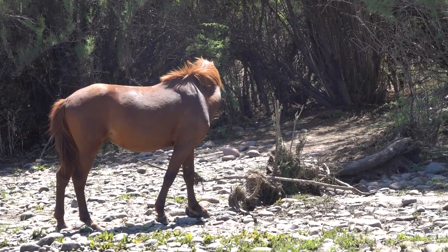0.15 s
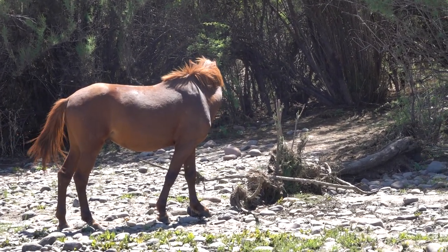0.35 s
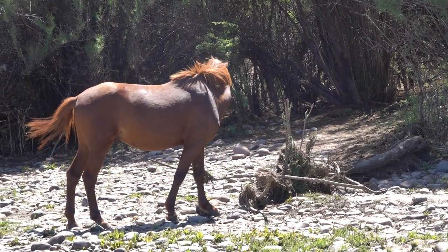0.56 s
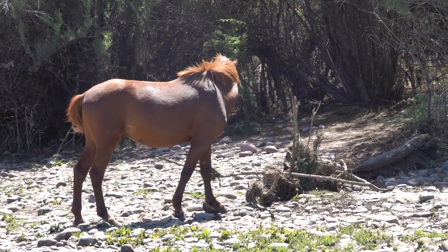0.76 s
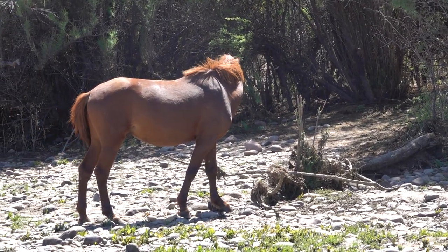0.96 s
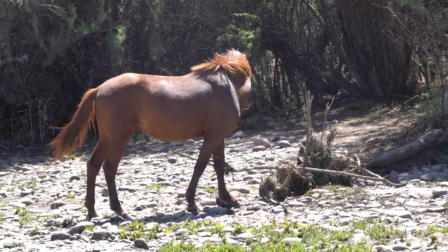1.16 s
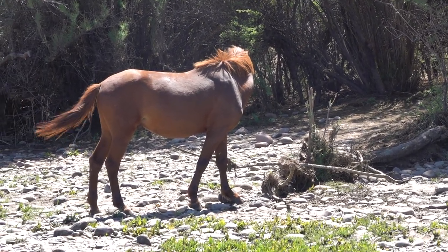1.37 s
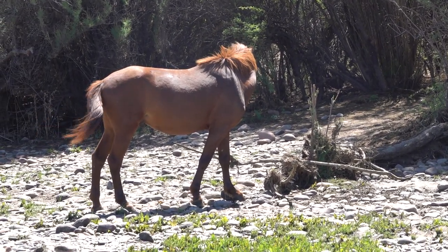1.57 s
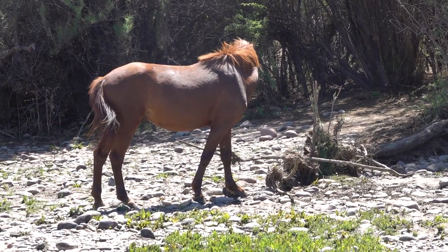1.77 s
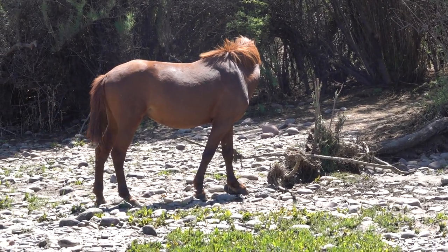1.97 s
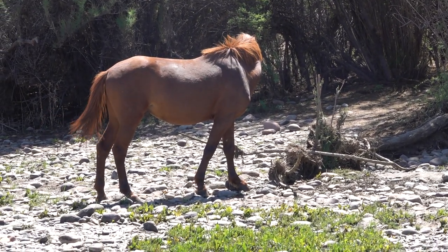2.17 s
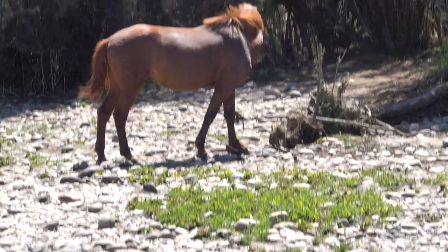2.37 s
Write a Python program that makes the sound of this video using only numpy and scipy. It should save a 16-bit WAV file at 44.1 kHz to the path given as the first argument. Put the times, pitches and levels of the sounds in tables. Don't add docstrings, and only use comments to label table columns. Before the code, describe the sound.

Continuous fluttering wind rumble on exposed microphones, a faint far river hush beneath, a distant bird's short buzz and quick falling trill, then increasingly busy handling clicks, knocks and rubbing close on the camera body.

```python
import sys
import numpy as np
from scipy import signal
from scipy.fft import rfft, irfft, next_fast_len
from scipy.io import wavfile
from scipy.ndimage import uniform_filter1d, map_coordinates

SR = 44100
rng = np.random.default_rng(int(sys.argv[2]) if len(sys.argv) > 2 else 0)


def master_out(mix):
    frames = np.transpose(np.atleast_2d(mix))
    ceiling = np.clip(frames, -1, 1)
    pcm = np.round(ceiling * 32767).astype(np.int16)
    wavfile.write(sys.argv[1], SR, pcm)


def boost_factor(decibels):
    exponent = np.asarray(decibels, float) / 20
    return 10 ** exponent


N = 111573

# (time [s], strength [dB], turbulence [dB])
GUSTS = [(0, -20.5, -10), (.14, -22, -9.5), (.3, -19, -6), (.42, -22, -4.5), (.56, -17.5, -6),
         (.66, -17.5, -5), (.82, -25.5, -2.5), (.93, -21.5, -5.5), (1.12, -23, -7), (1.2, -29.5, -6),
         (1.33, -24.5, -11), (1.45, -24, -5), (1.6, -23, -6.5), (1.72, -23.5, -3), (1.9, -21.5, -4),
         (2.1, -20, -1.5), (2.35, -19.5, -4.5), (2.48, -21, -2)]
# (frequency [Hz], level [dB per Hz])
RUMBLE_SPECTRUM = [(12, -50), (20, -10.5), (92, -2.5), (119, -3.5), (260, -12.5), (433, -26.5), (476, -39),
                   (720, -59), (900, -64), (1170, -83), (1980, -120)]
# (frequency [Hz], level [dB])
EDDY_SPECTRUM = [(60, -27.5), (150, 6), (260, 2.5), (450, -5), (700, -19.5), (1200, -39.5), (2500, -52),
                 (5000, -61)]
# (time [s], peak level [dB])
EDDY_HITS = [(0.269, -22.5), (0.456, -42.5), (0.549, -26), (0.608, -18.5), (0.648, -18.5), (0.67, -16.5),
             (0.725, -19.5), (0.947, -27.5), (1.049, -21.5), (1.094, -21), (1.13, -17), (1.588, -25.5),
             (1.921, -38.5), (2.494, -31)]
# (frequency [Hz], left lead [rad])
WIND_PHASE = [(40, 0.55), (90, 0.47), (215, 1.18), (390, 1.663)]
# (frequency [Hz], left minus right [dB])
WIND_BALANCE = [(200, 0.4), (700, -3)]
# (frequency [Hz], unrelated share [1])
WIND_INCOHERENCE = [(40, .13), (130, .17), (300, .33), (600, .4)]


def wind():
    strength_db, turbulence_db = curves(GUSTS)
    rumble = unit(filtered(rng.standard_normal((2, N)), lambda hz: boost_factor(along(RUMBLE_SPECTRUM, hz))))
    rumble = rumble * boost_factor(strength_db + 1.84 * wobble(14))
    flutter = boost_factor(strength_db + 2 + 1.415 * turbulence_db + 2.23 * wobble(24.96))
    swirl = boost_factor(10) * bursts([(s, db, 0.0086) for s, db in EDDY_HITS], rise_s=0.008)
    thumps = np.zeros(N)
    for s, db in EDDY_HITS:
        thumps[round((s + .003) * SR)] = boost_factor(db + 7.5) * rng.choice([-1, 1])

    def colour(hz):
        return boost_factor(along(EDDY_SPECTRUM, hz)) * 1j / (1 + (hz / 3000) ** 10)

    eddies = rubbed(flutter, 500, 4.3, colour) + rubbed(swirl, 970, 0.89, colour)
    eddies = eddies + 60 * filtered(thumps, colour)
    shared, own = rumble + eddies
    own = filtered(own, lambda hz: along(WIND_INCOHERENCE, hz))
    return ports(shared, own, WIND_PHASE, WIND_BALANCE, apart=1)


# (time [s], pressure [dB])
GRIP_PRESSURE = [(1.33, -63), (1.45, -52), (1.58, -53), (1.77, -45), (1.88, -41.5), (2.03, -44),
                 (2.25, -38), (2.4, -44.5), (2.47, -54)]
# (frequency [Hz], left lead [rad])
SHELL_PHASE = [(860, 1.1), (1460, .1), (2400, -1.4), (3900, -2.7), (5500, -3.4), (9500, -6.2)]
# (frequency [Hz], left minus right [dB])
SHELL_BALANCE = [(700, -4), (1400, -3.5), (2400, -8), (4400, -10), (8000, -1), (15000, -.5)]
# (frequency [Hz], left lead [rad])
SLIDE_PHASE = [(6000, 3), (8500, .2)]


def hand():
    on = np.clip((np.arange(N) / SR - GRIP_PRESSURE[0][0]) / 0.042, 0, 1)
    pressure = on * boost_factor(curves(GRIP_PRESSURE)[0] + 1.8 * wobble(45))
    shell = creak(pressure) + ticks() + taps() * [[1], [0]]
    shell = ports(*shell, SHELL_PHASE, SHELL_BALANCE, apart=.2)
    friction = patchy(slide(on) + cloth(), depth_db=2)
    return shell + ports(*friction, SLIDE_PHASE, SHELL_BALANCE, apart=.55) + sleeve(on)


# (time [s], peak level [dB], length [s])
GRIP_KNOCKS = [(1.379, -50.5, 0.0026), (1.417, -38, .025), (1.455, -51.5, 0.011), (1.527, -47, 0.011),
               (1.636, -40.5, 0.014), (1.683, -37, 0.012), (1.712, -24, .018), (1.75, -43.5, 0.0058),
               (1.80, -38, 0.0066), (1.831, -36, 0.05), (1.958, -47, 0.026), (1.992, -32.5, 0.025),
               (2.053, -30, 0.015), (2.071, -25.5, 0.015), (2.083, -25.5, 0.011), (2.158, -34, 0.016),
               (2.184, -20, 0.009), (2.191, -22.5, .014), (2.213, -22.5, 0.0089), (2.228, -31.5, 0.024),
               (2.285, -30.5, 0.007), (2.345, -38.5, 0.02), (2.405, -34.5, 0.029)]
# (frequency [Hz], width [Hz], level [dB])
SHELL_MODES = [(918, 484, -1), (1464, 395, 2), (2000, 474, -6.5), (3000, 460, -15.5), (3453, 290, -17),
               (5700, 1900, -37.5)]


def creak(pressure):
    force = pressure + boost_factor(-4) * bursts(GRIP_KNOCKS, rise_s=0.00029)
    ringing = patchy(rubbed(force, 5000, 3, high_body(SHELL_MODES, 430)), depth_db=2.0)
    return filtered(ringing, lambda hz: 1 / (1 + 1j * hz / 7000) ** 2)


# (time [s], peak level [dB])
CATCHES = [(1.1298, -57), (1.649, -51), (1.6868, -38.5), (1.713, -41), (1.7266, -43.5), (1.8307, -41.5),
           (1.8684, -42), (1.975, -37.5), (2.0004, -43), (2.0547, -31), (2.0811, -23.5), (2.152, -42.5),
           (2.1628, -38.5), (2.1896, -44.5), (2.1953, -37), (2.2155, -35.5), (2.226, -36.5), (2.282, -43),
           (2.3385, -46.5), (2.3724, -36.5), (2.4056, -39)]
# (frequency [Hz], width [Hz], level [dB])
CATCH_MODES = [(2820, 400, 1.5), (3680, 420, 4.5), (5350, 410, -4.5), (10700, 2200, -22.5),
               (14200, 2500, -28.5)]


def ticks():
    envelope = boost_factor(-6.5) * bursts([(s, db, 0.004) for s, db in CATCHES], rise_s=0.00027)
    pings = [(s, db, 3200 * np.exp(rng.normal(0, 0.074))) for s, db in CATCHES]
    ping = boost_factor(-9) * struck(pings, peak_s=0.002)
    return rubbed(envelope, 9300, 2.7, high_body(CATCH_MODES, 2100)) + ping * [[1], [0]]


# (time [s], peak level [dB], frequency [Hz])
FINGER_TAPS = [(1.383, -29.5, 904), (1.429, -27.5, 1110), (1.454, -37, 934), (1.559, -37, 1110),
               (1.638, -28.5, 1114), (1.685, -27, 1700), (1.712, -19.5, 1508), (1.718, -21, 1097),
               (1.755, -30, 1133), (1.802, -29, 1447), (1.831, -33.5, 1320), (1.868, -28, 1370),
               (1.959, -23, 1564), (1.977, -21, 1300), (1.997, -31, 1554), (2.004, -25.5, 1266),
               (2.054, -29.5, 1860), (2.059, -28, 1330), (2.071, -22, 1074), (2.082, -13, 1316),
               (2.165, -25, 1306), (2.191, -16, 827), (2.198, -24, 1410), (2.203, -24, 1464),
               (2.216, -20, 1050), (2.216, -21, 1255), (2.315, -23, 1120), (2.373, -31.5, 974),
               (2.41, -33, 1400)]


def taps():
    return boost_factor(-3.5) * struck(FINGER_TAPS, peak_s=0.0013)


# (time [s], sliding speed [dB])
SLIDE_SPEED = [(1.37, -80), (1.43, -69), (1.6, -79.5), (1.69, -65), (1.76, -70.5), (1.87, -62), (1.93, -71),
               (1.97, -59.5), (2.12, -65), (2.2, -60), (2.35, -65), (2.425, -53), (2.45, -57),
               (2.53, -62.5)]
# (frequency [Hz], width [Hz], level [dB])
UPPER_MODES = [(2900, 640, 12), (3720, 750, 9.5), (5360, 800, 6.5), (6840, 990, -3.5)]


def slide(on):
    speed = on * boost_factor(curves(SLIDE_SPEED)[0] + 1.7 * wobble(41))
    return rubbed(speed, 6000, 3.4, high_body(UPPER_MODES, 2400))


# (time [s], level [dB], length [s])
STRAP_SLIPS = [
    (.37, -61, 0.056),
    (.448, -63.5, 0.006),
]
# (frequency [Hz], width [Hz], level [dB])
STRAP_MODES = [(4600, 300, 3.5), (6330, 250, 1.5), (5650, 800, -7), (7050, 250, -3.5), (11240, 450, -13),
               (12600, 450, -8.5)]
# (time [s], level [dB], length [s])
CUFF_RUBS = [
    (1.19, -64.5, 0.076),
]
# (frequency [Hz], width [Hz], level [dB])
CUFF_MODES = [(4800, 300, -5), (5900, 500, 2.5), (6460, 540, 0), (7200, 460, -6), (9700, 370, -17.5)]
# (time [s], level [dB], length [s])
BUCKLE_SCRAPES = [
    (1.945, -53.5, 0.065),
    (2.15, -57.5, 0.073),
]
# (frequency [Hz], width [Hz], level [dB])
BUCKLE_MODES = [(5390, 320, 4.5), (6610, 250, -3), (7260, 400, -12)]


def cloth():
    strap = rubbed(bursts(STRAP_SLIPS, rise_s=.014), 4000, 3, high_body(STRAP_MODES, 2500))
    cuff = rubbed(bursts(CUFF_RUBS, rise_s=.012), 4000, 3.3, high_body(CUFF_MODES, 3800))
    buckle = rubbed(bursts(BUCKLE_SCRAPES, rise_s=.012), 4000, 3.3, high_body(BUCKLE_MODES, 3800))
    return strap + cuff + buckle


# (time [s], brushing speed [dB])
SLEEVE_SPEED = [(1.4, -81.5), (1.62, -86), (1.685, -68.5), (1.71, -81.5), (1.93, -78.5), (2.02, -63.5),
                (2.12, -66), (2.165, -63.5), (2.22, -71.5), (2.33, -62), (2.42, -60.5), (2.445, -64),
                (2.5, -71), (2.53, -66)]
# (frequency [Hz], level [dB])
WEAVE_SPECTRUM = [(4500, -40), (7900, -13), (9000, -2), (9900, -7), (11000, 0), (12500, -11), (14300, -2),
                  (15700, -9)]
# (frequency [Hz], level [dB])
SEAM_SPECTRUM = [(4000, -32), (6500, -3), (8200, 1.5), (12500, 4.5), (14500, 0.5), (15700, -10)]


def sleeve(on):
    speed = on * boost_factor(curves(SLEEVE_SPEED)[0] + 1.2 * wobble(40))
    seam_s, turn_s = 2.335, .01
    seam = 1 / (1 + np.exp(-(np.arange(N) / SR - seam_s) / turn_s))
    hiss = rubbed(speed * (1 - seam), 9000, 2, lambda hz: boost_factor(along(WEAVE_SPECTRUM, hz)))
    hiss = hiss + rubbed(speed * seam, 9000, 2, lambda hz: boost_factor(along(SEAM_SPECTRUM, hz)))
    return ports(*patchy(hiss * np.sqrt(.4), depth_db=1.2), [(8000, .2)], [(8000, -.8)], apart=.45)


def bird():
    song = np.zeros(N)
    chip(song)
    buzz(song)
    trill(song)
    t = np.arange(SR // 4) / SR
    tail = rng.standard_normal((2, len(t))) * boost_factor(-60 * t / .25)
    tail = tail / np.linalg.norm(tail[0])
    echo = signal.fftconvolve(np.pad(song, (400, 0))[None], tail, axes=1)[:, :N]
    phase = np.array([[.9], [-.9]])
    near = filtered(song, lambda hz: np.exp(1j * phase + 0 * hz)) * boost_factor([[4.5], [3.5]])
    return near + boost_factor(-12) * echo


# (time [s], level [dB])
CHIP_CALL = (0.18, -73.5)


def chip(song):
    add(song, CHIP_CALL[0], boost_factor(CHIP_CALL[1]) * note(0.017, 5800, 4300, rough=.2))


# (time [s], level [dB])
BUZZ_LEVEL = [(.21, -57), (.26, -54.5), (.3, -56), (.37, -57.5), (.385, -62), (.41, -58.5), (.445, -66.5)]


def buzz(song):
    level_db, = curves(BUZZ_LEVEL)
    length_s, rate_hz, sag_s = 0.014, 69, .368
    for k in range(16):
        s = .223 + k / rate_hz
        hz = 3558 - 4500 * max(s - sag_s, 0)
        rough = .04 if s < sag_s else .17
        level = boost_factor(level_db[round(s * SR)] + rng.normal(0, 1.2))
        pulse = note(length_s, hz - 160, hz - 4 * k + rng.normal(0, 16), rough)
        add(song, s - length_s / 2, level * pulse)


# (time [s], peak level [dB])
TRILL_LEVEL = [(.65, -66), (.74, -60.5), (.88, -56), (1.16, -62.5), (1.45, -58.5)]


def trill(song):
    level_db, = curves(TRILL_LEVEL)
    for k in range(18):
        s = .6515 + k * .0452 + k * k * .00012
        db = level_db[round(s * SR)] + rng.normal(0, 0.81)
        vary = 1 + rng.normal(0, .008)
        add(song, s - .004, boost_factor(db) * note(0.012, 3820 * vary, 3544 * vary))
        add(song, s - 0.013, boost_factor(db - 8) * note(0.013, 5600 * vary, 4650 * vary, rough=.2))


def note(length_s, from_hz, to_hz, rough=0.):
    u = np.arange(int(length_s * SR)) / (length_s * SR)
    hz = to_hz + (from_hz - to_hz) * (1 - u) ** 2
    blur = rough * np.cumsum(rng.standard_normal(len(u)))
    return np.sin(np.pi * u) ** 0.86 * np.sin(2 * np.pi * np.cumsum(hz) / SR + blur)


# (frequency [Hz], level [dB per Hz])
RIVER_SPECTRUM = [(410, -30), (700, -3), (787, -4), (896, 3), (1090, 2), (1430, -2), (2970, -24.5),
                  (3210, -20), (15700, -39.5)]
# (frequency [Hz], left-right likeness [1])
RIVER_COHERENCE = [(1000, 0.14), (2400, 0.32), (6000, 0.47), (12000, 0.86)]


def river():
    def mid_gain(hz):
        turn = np.arccos(np.clip(along(RIVER_COHERENCE, hz), -1, 1)) / 2
        return boost_factor(along(RIVER_SPECTRUM, hz)) * np.array([np.cos(turn), np.sin(turn)])

    mid, side = filtered(rng.standard_normal((2, N)), mid_gain)
    hush = unit(np.array([mid + side, mid - side]))
    return boost_factor(-56 + 0.4 * wobble(35)) * hush * boost_factor([[-1.2], [1.2]])


def ports(x, other, lead, pan, apart):
    side = np.array([[.5], [-.5]])

    def turn(hz):
        return boost_factor(side * along(pan, hz)) * np.exp(1j * side * along(lead, hz))

    return filtered(x + apart * 2 * side * other, turn)


def rubbed(envelope, rate, spread_db, response):
    pair = np.array([slips(envelope, rate, spread_db) for _ in range(2)])
    power = np.mean(abs(response(np.linspace(1, SR / 2, 4000))) ** 2)
    return filtered(pair, response) / np.sqrt(power)


def slips(envelope, rate, spread_db):
    draw = rng.random((3, N))
    size = boost_factor(-spread_db * np.log(draw[1] + 0.085))
    return envelope * unit((draw[0] < rate / SR) * size * (draw[2] - .5))


def struck(rows, peak_s):
    x, t = np.zeros(N), np.arange(SR // 40) / SR
    for s, db, hz in rows:
        envelope = t / peak_s * np.exp(1 - t / peak_s)
        add(x, s, boost_factor(db) * envelope * np.sin(2 * np.pi * hz * t))
    return x


def bursts(rows, rise_s):
    t = np.arange(N) / SR
    total = np.zeros(N)
    for s, db, length_s in rows:
        rise = 1 - np.exp(-np.clip(t - s, 0, None) / rise_s)
        fade = np.exp(-np.clip((t - s) / abs(length_s), 0, 9) ** 1.3)
        total += boost_factor(db) * rise * fade
    return total


def body(modes):
    def response(f):
        total = 0
        for k, (hz, width, db) in enumerate(modes):
            total = total + (-1) ** k * boost_factor(db) * 1j * f * width / (hz * hz - f * f + 1j * f * width)
        return total
    return response


def high_body(modes, low_hz):
    return lambda f: body(modes)(f) * (1j * f / (low_hz + 1j * f)) ** 3


def patchy(x, depth_db):
    z = signal.stft(x, nperseg=256)[2]
    field = uniform_filter1d(rng.standard_normal(z.shape[1:]), size=3, axis=0)
    field = uniform_filter1d(field, size=5, axis=1)
    return signal.istft(z * boost_factor(depth_db * unit(field)), nperseg=256)[1][:, :N]


def filtered(x, response):
    m = next_fast_len(N + SR // 2)
    return irfft(rfft(x, m) * response(np.fft.rfftfreq(m, 1 / SR)), m)[..., :N]


def unit(x):
    return x / np.sqrt(np.mean(x ** 2) + 1e-20)


def along(points, hz):
    f, v = np.transpose(points)
    return np.interp(np.log(hz + 1), np.log(f + 1), v)


def curves(rows):
    s, *cols = np.transpose(rows)
    return [np.interp(np.arange(N) / SR, s, c) for c in cols]


def wobble(rate):
    knots = rng.standard_normal(int(N * rate / SR) + 4)
    return map_coordinates(knots, [np.arange(N) * rate / SR])


def add(track, s, sound):
    track[round(s * SR):][:len(sound)] += sound


def scene():
    return wind() + hand() + bird() + river()


def low_pass(x):
    return signal.sosfilt(signal.butter(12, 15870, fs=SR, output="sos"), x)


def record(dry):
    return low_pass(dry)


dry = scene()
out = record(dry)
master_out(out)
```